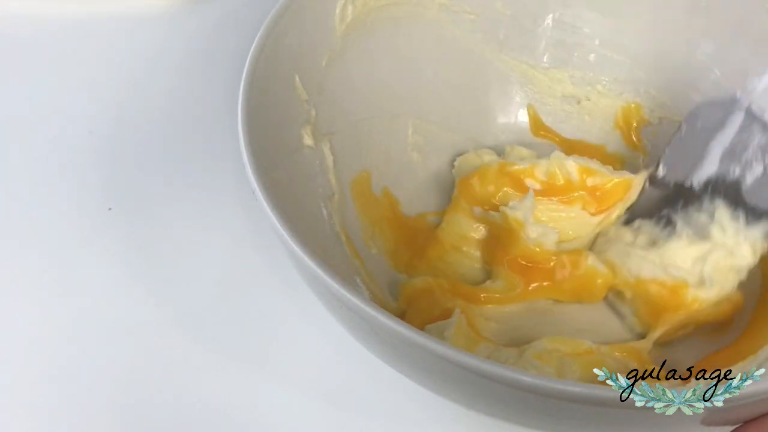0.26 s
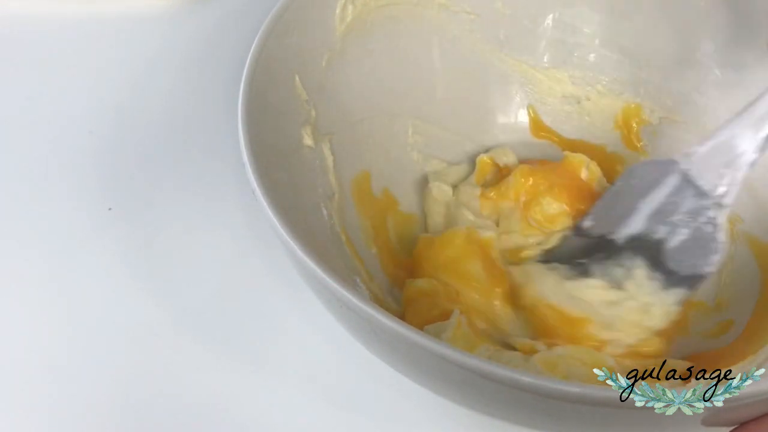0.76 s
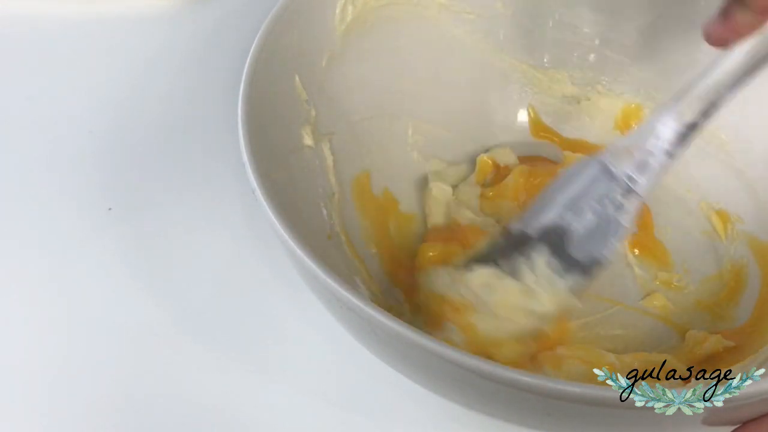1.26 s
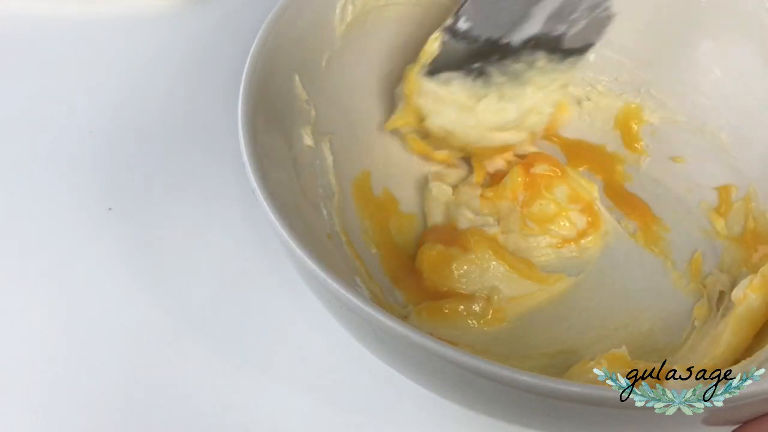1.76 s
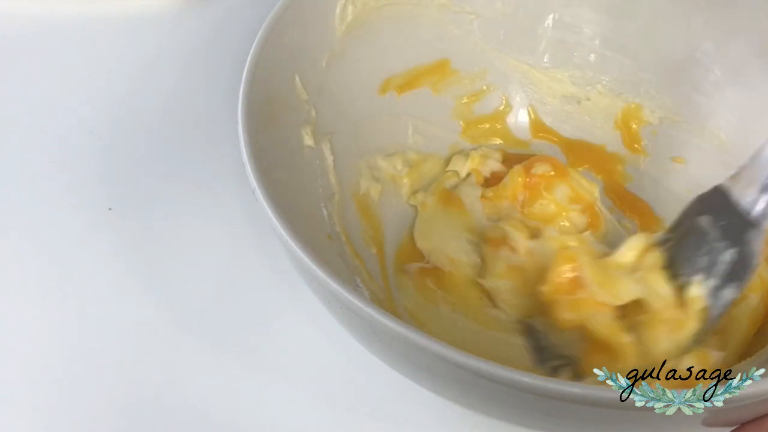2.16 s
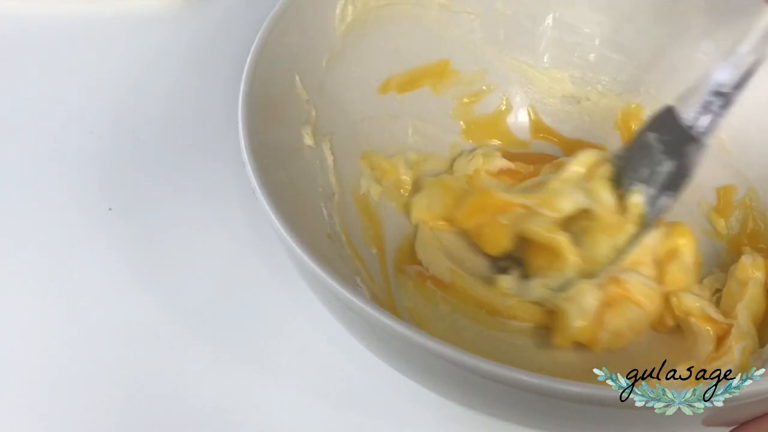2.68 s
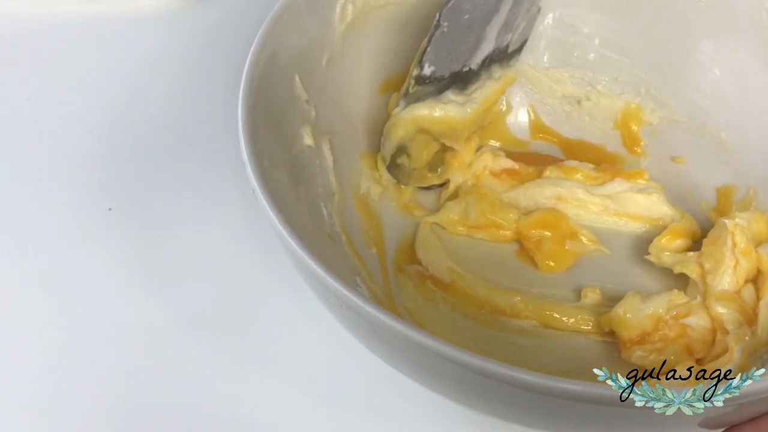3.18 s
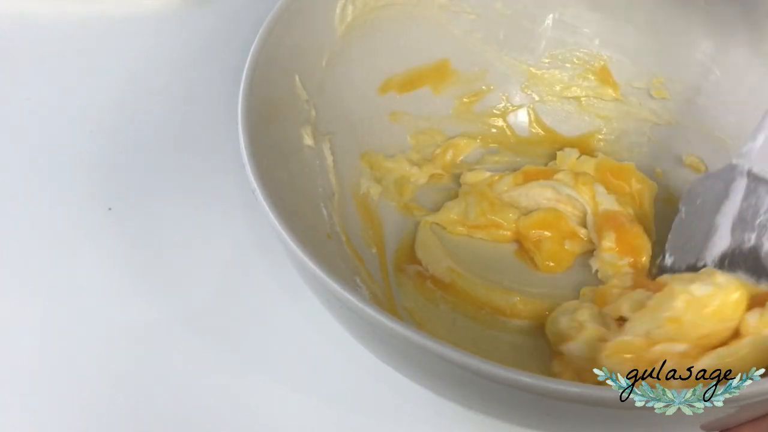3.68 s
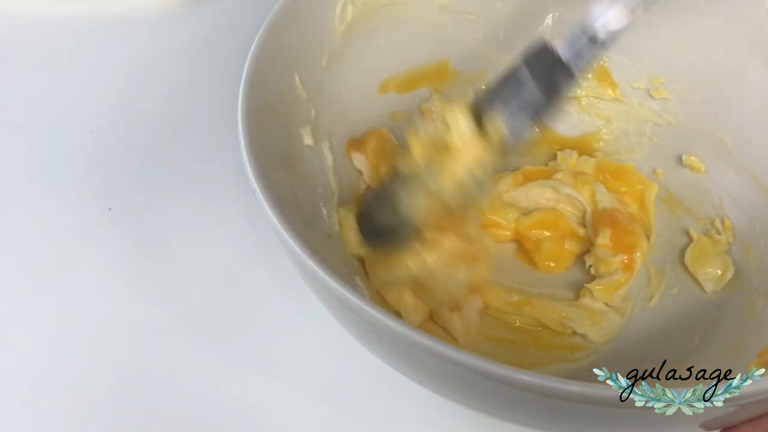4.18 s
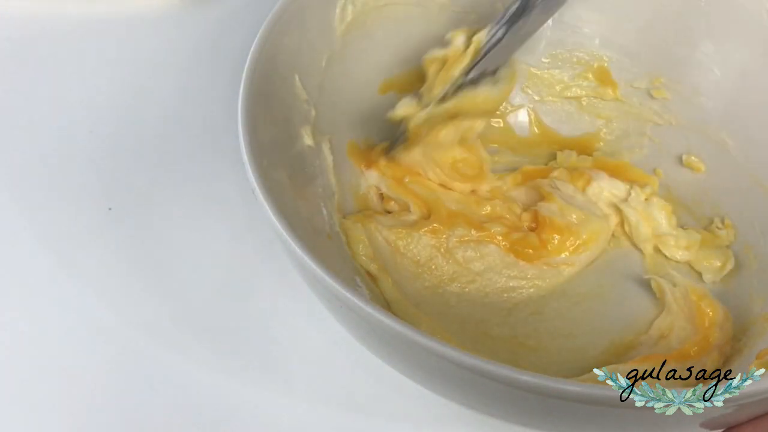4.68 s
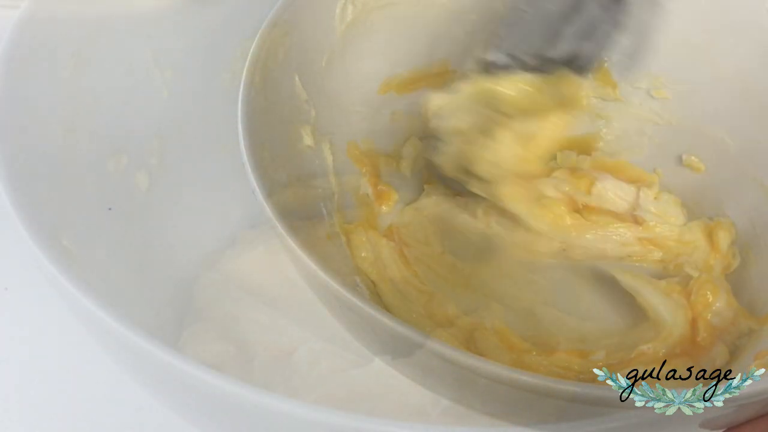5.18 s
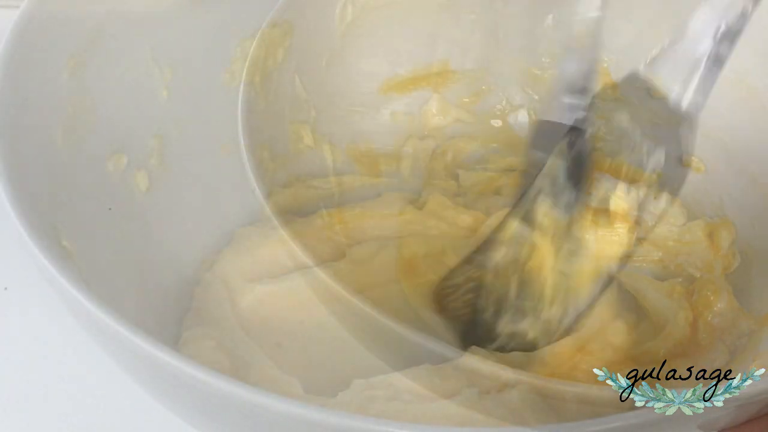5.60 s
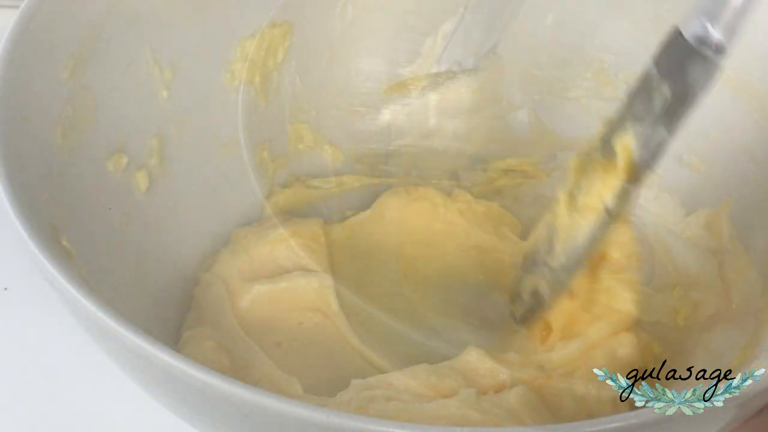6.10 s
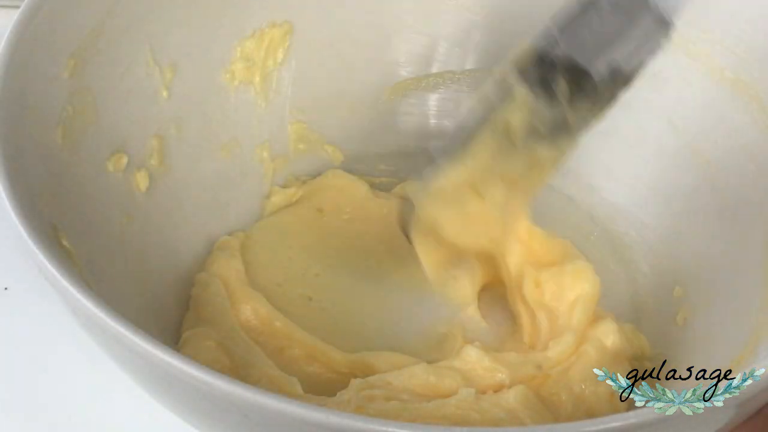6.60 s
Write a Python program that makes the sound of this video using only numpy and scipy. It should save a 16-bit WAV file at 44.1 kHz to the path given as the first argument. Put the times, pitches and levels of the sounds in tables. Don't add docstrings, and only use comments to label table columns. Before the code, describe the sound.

Thick buttery paste is folded close up: moist clicks and squishy strokes, hollow low thuds of the bowl, one longer scraping sweep midway.

```python
import sys
import numpy as np
from scipy import signal
from scipy.fft import rfft, irfft
from scipy.io import wavfile

SR = 44100
rng = np.random.default_rng(int(sys.argv[2]) if len(sys.argv) > 2 else 0)


def level_to_linear(level):
    exponent = np.asarray(level, float) / 20
    return 10 ** exponent


def to_wav(sig):
    pcm = np.clip(np.atleast_2d(sig), -1, 1) * 32767
    pcm = np.round(pcm).astype(np.int16)
    wavfile.write(sys.argv[1], SR, pcm.T)


N = 302082

# t/s, peak level/dB, boom near 110 Hz/dB, body near 290 Hz/dB, edge near 700 Hz/dB
KNOCKS = [(0.0, -46.5, -23, 1.5, -2), (0.299, -62, 2, -1, 0), (0.623, -35, -4, -4.5, 8.5),
          (1.362, -68, -7.5, 11, -10), (1.555, -59.5, -24, -19, 17.5), (1.922, -49, 0.5, -1, 2),
          (2.023, -44.5, -6, -2.5, -9), (2.618, -40, 11.5, 2.5, -29), (2.633, -30.5, -13, 1.5, 8.5),
          (3.254, -28, -2, -0.5, 7.5), (3.862, -75, -1, -17, -2), (3.93, -28.5, -7, -6, 6.5),
          (4.799, -29, -4.5, -5.5, 8), (4.904, -51.5, 7, -45, 21), (5.092, -79.5, -2, -32, 40),
          (5.654, -42, -7.5, -10, -37), (6.231, -55, 5, -1, 1), (6.436, -67.5, 14, -10, -25)]
# f/Hz, level/dB, t60/s
BOOM_MODES = [(53, -3, 0.77), (93.6, -0.5, 0.34), (133, -2.5, 0.8), (152, -6.5, 0.45), (188, 5, 0.36),
              (216, -6.5, 0.12), (270, -17, 0.23), (272, -3, 0.3), (307, 1, 0.35),
              (338, -12, 0.24), (421, -9, 0.12), (462, -12, 0.08), (490, -1, 0.13), (575, -14.5, 0.41),
              (641, -16, 0.33), (687, -3.5, 0.088), (759.7, -12, 0.24), (825, -8, 0.062), (858, -29, 0.11),
              (1000, -9, 0.034), (1127, -14.5, 0.14), (1368, -11.5, 0.062), (1800, -70, 0.033)]
MODES = BOOM_MODES
CONTROL_S = 0.004


def rms_one(x):
    return x / np.sqrt(np.mean(x ** 2) + 1e-20)


def in_time(rows):
    s, *columns = np.transpose(rows)
    return [np.interp(np.arange(N) / SR, s, c) for c in columns]


def at_hz(points, hz):
    point_hz, value = np.transpose(points)
    return np.interp(np.log(hz), np.log(point_hz), value)


def band(x, low_hz, high_hz):
    return signal.sosfilt(signal.butter(2, [low_hz, high_hz], "band", fs=SR, output="sos"), x)


def ring(x, hz, t60):
    r, w = level_to_linear(-60 / (t60 * SR)), 2 * np.pi * hz / SR
    return signal.lfilter([0, np.sin(w)], [1, -2 * r * np.cos(w), r * r], x + 1e-18)


def drift(rate_hz):
    r = np.exp(-80 * np.pi * rate_hz / SR)
    slow = signal.lfilter([1], [1, -2 * r, r * r], rng.standard_normal(N // 40 + 2002))[2000:]
    return np.interp(np.arange(N) / 40, np.arange(len(slow)), rms_one(slow))


def thuds(jolt_s, rise_cycles, wobble_db):
    t = np.arange(200) / SR
    jolt = np.exp(-t / jolt_s) * t
    s, db = np.transpose(KNOCKS)[:2]
    chance = rng.standard_normal((len(KNOCKS), len(MODES), 5))
    lag_s = np.cumsum(rng.uniform(.012, .045, (len(KNOCKS), 4)), axis=1)
    at = np.round((s[:, None] + np.c_[0 * s, lag_s]) * SR).astype(int)
    out = np.zeros(N)
    for m, (hz, mode_db, t60) in enumerate(MODES):
        tilt_db = [np.interp(np.log(hz), np.log([110, 190, 290, 700]), [boom, 0, body, edge])
                   for _, _, boom, body, edge in KNOCKS]
        wobble = level_to_linear(wobble_db - 60 * lag_s / t60) * chance[:, m, 1:]
        first = level_to_linear(1.5 * chance[:, m, 0])
        force = np.zeros(N)
        force[at] = level_to_linear(db + mode_db + tilt_db)[:, None] * np.c_[first, wobble]
        late = np.clip(np.log2(800 / hz), 0, 1)
        sign = -1 if hz < 230 and m % 2 else 1
        out += sign * ring(force, hz, t60)
        out -= sign * late * ring(force, hz, rise_cycles / hz)
    return signal.lfilter(jolt / jolt.sum(), [1], out)


def pops(swell_cycles, ring_cycles, snap_s):
    # t/s, peak level/dB, f/Hz, snap level/dB
    air_pockets = [(0.0466, -25, 2870, -0.5), (0.6805, -30.5, 5950, -23), (0.7627, -42.5, 1000, 18),
                   (0.763, -32, 3700, -5), (0.7963, -25, 3600, -8.5), (0.9878, -34.5, 2200, 10),
                   (1.0042, -32.5, 4070, -3), (1.39, -35, 3680, -5), (1.494, -39, 6500, 2),
                   (1.5474, -51, 2600, 2), (1.62, -48, 1730, 8), (1.636, -50, 1680, -9),
                   (1.8808, -54.5, 5850, 13), (2.0071, -55, 2100, 16.5), (2.0696, -39.5, 7200, 2),
                   (2.09, -35.5, 6650, -5), (2.3815, -38, 3370, 1.5), (2.6304, -46.5, 1800, 14.5),
                   (3.2316, -50.5, 6140, 7.5), (4.1791, -52, 2560, 7), (4.2945, -31, 4950, 4),
                   (4.4876, -51, 1700, 8.5), (4.5276, -46, 5900, -2), (4.629, -46.5, 1610, 9.5),
                   (4.8973, -37, 2050, 1), (5.036, -47.5, 3500, 3.5), (5.0983, -46, 2440, 4),
                   (5.354, -50.5, 1670, -17), (6.1946, -48, 3840, -3), (6.206, -45.5, 3900, -4),
                   (0.0552, -30, 7600, -1.5), (0.2204, -42, 11700, -11), (0.4342, -36.5, 12600, -3.5),
             (0.6805, -28, 11900, -19), (0.78, -43, 8900, 5.5), (0.8104, -46, 13700, -3),
             (1.361, -39, 14000, 1), (1.444, -42, 14100, -4), (1.496, -27.5, 8650, -28),
             (2.38, -27.5, 10100, -18), (2.4166, -51, 7060, 3), (2.7272, -38, 9300, -2.5),
             (2.9253, -48, 9150, -10), (3.01, -41.5, 11900, -14), (4.265, -38, 14800, -6),
             (4.326, -36, 7100, 5.5), (4.3725, -47, 13600, -6), (4.575, -27.5, 12000, -7.5),
             (4.59, -33, 14200, -4), (4.781, -48, 13000, 0), (4.7974, -46, 7290, -5),
             (4.8055, -31, 12500, -15), (4.886, -37.5, 13400, -8), (4.9424, -41, 6900, -8),
             (5.05, -33, 11100, -10), (5.1744, -44, 14500, -5), (5.613, -41, 9100, -11),
             (5.634, -41.5, 9000, -6), (6.4873, -48.5, 8800, -2),
                   (0.854, -51, 9080, -3), (1.5464, -40, 12800, -5), (1.6192, -46, 9500, 3),
            (1.636, -37.5, 13200, -2), (1.6776, -44, 15100, -9), (2.0489, -48, 7320, -9),
            (2.2722, -52, 10000, -2), (2.707, -44, 8500, -5.5), (3.3557, -38, 12200, -8),
            (3.9193, -45.5, 13700, -3), (3.9609, -43.5, 11100, -6), (4.143, -50, 12000, -3)]
    pockets = air_pockets
    out, t = np.zeros(N + 400), np.arange(400) / SR
    tear = rng.standard_normal((len(pockets), 400))
    for (s, db, hz, snap_db), noise in zip(pockets, tear):
        cycles = t * hz
        swell = np.sin(np.pi / 2 * np.minimum(cycles / swell_cycles, 1)) ** 2
        decay = level_to_linear(-60 * np.maximum(cycles - swell_cycles, 0) / ring_cycles)
        tone = np.sin(2 * np.pi * cycles) * swell * decay
        burst = noise * t / snap_s * np.exp(1 - t / snap_s)
        snap = band(burst, .45 * hz, min(2.2 * hz, 16000))
        out[round(s * SR):][:400] += level_to_linear(db) * (tone + level_to_linear(snap_db) * snap)
    return out[:N]


def blade():
    # start t/s, held t/s, level/dB, f/Hz
    strokes = [(0.05, 0.044, -56.5, 2600), (0.29, 0.043, -60, 2560), (0.62, 0.039, -60.5, 2000),
               (0.8, 0.14, -69.5, 2930), (0.96, 0.075, -62.5, 2200), (1.37, 0.022, -63, 2310),
               (1.54, 0.087, -60.5, 2190), (1.88, .04, -65, 2470), (2.0, 0.092, -67, 1880),
               (2.31, 0.031, -67.5, 2140), (2.63, 0.035, -56, 1440), (2.84, 0.055, -70, 2390),
               (4.54, 0.028, -64, 2350), (4.808, 0.016, -56.5, 3630), (4.9, 0.028, -66.5, 2300),
               (5.04, 0.067, -67, 2300), (5.41, 0.019, -63.5, 1800), (5.49, 0.14, -65.5, 1840),
               (5.62, 0.063, -63, 1480), (6.12, 0.032, -66.5, 1800), (6.23, 0.063, -64, 494)]
    # start t/s, held t/s, level/dB, f/Hz
    peels = [(0.05, 0.013, -57.5, 5200), (0.29, 0.055, -62.5, 4580), (0.62, 0.12, -67, 5500),
             (0.8, 0.09, -64, 3600), (0.985, 0.02, -56, 3950), (1.36, 0.044, -65, 4700),
             (1.5, 0.19, -63, 7400), (1.75, .1, -72, 8100), (1.88, 0.017, -58.5, 6240),
             (2.0, 0.037, -58.5, 5400), (2.31, 0.019, -64, 4600), (2.38, .05, -63.5, 8500),
             (2.63, 0.02, -62, 5230), (2.85, 0.042, -63, 4700), (4.17, 0.023, -67.5, 5050),
             (4.29, 0.07, -63, 7040), (4.54, 0.1, -65.5, 5260), (4.8, 0.038, -63.5, 6200),
             (5.05, 0.068, -65.5, 9200), (5.367, 0.049, -61, 6300), (5.5, .16, -67.5, 3300),
             (6.17, 0.066, -73, 4500)]
    # t/s, hollow level/dB, hollow f/Hz, ring level/dB, ring f/Hz
    sweep_rows = [
        (3.23, -67.5, 1910, -62, 5100),
        (3.35, -61, 2700, -67.5, 5430),
        (3.42, -57.5, 1410, -62.5, 5170),
        (3.5, -50.5, 1480, -55.5, 4900),
        (3.575, -45.5, 2170, -55, 5940),
        (3.65, -52, 1800, -57.5, 4080),
        (3.73, -63, 1930, -62.5, 5130),
        (3.88, -61, 1900, -67.5, 5600),
        (4.04, -76, 1600, -76, 5530),
    ]
    onset_db_per_s, fade_db_per_s, idle_db = 800, 141, -77
    t, sweep, columns = np.arange(0, N / SR, CONTROL_S), np.transpose(sweep_rows), []
    for rows, sweep_db, sweep_hz in [(strokes, *sweep[1:3]), (peels, *sweep[3:])]:
        s, held, db, hz = np.transpose(rows)[:, :, None]
        db = db - onset_db_per_s * np.maximum(s - t, 0) - fade_db_per_s * np.maximum(t - s - held, 0)
        db = np.vstack([db, np.interp(t, sweep[0], sweep_db, -200, -200)])
        hz = np.vstack([hz + 0 * t, np.interp(t, sweep[0], sweep_hz)])
        loudest = db.argmax(axis=0)
        columns += [np.maximum(db.max(axis=0), idle_db), hz[loudest, np.arange(len(t))]]
    return in_time(np.transpose([t, *columns]))


def smear(grain_db, grains_per_s):
    hollow_db, hollow_hz, bright_db, bright_hz = blade()
    sizes = level_to_linear(grain_db * np.minimum(rng.exponential(1, (2, N)), 3)) * rng.standard_normal((2, N))
    grains = sizes * (rng.random((2, N)) < grains_per_s / SR)
    width_oct = np.interp(hollow_db, [-62, -52], [.5, .22])
    out = 0
    for k, hz in enumerate(1000 * 2 ** np.arange(-1.5, 4, .25)):
        hollow = level_to_linear(hollow_db - 5.0) / (1 + (np.log2(hz / hollow_hz) / width_oct) ** 2)
        peak = np.exp(-.5 * (np.log2(hz / bright_hz) / 0.51) ** 2)
        air = np.interp(hz, [2400, 2600, 14000], [0, .55, .8])
        bright = level_to_linear(bright_db - 11.5) * (peak + air)
        patchy = level_to_linear(2.1 * drift(25.0))
        out = out + patchy * (hollow + bright) * rms_one(band(grains[k % 2], hz / 1.09, hz * 1.12))
    return out


def kitchen(x):
    # f/Hz, t60/s
    decay_times = [(600, .35), (2500, .35), (6000, .2), (14000, .15)]
    t = np.arange(SR // 2) / SR
    white = rng.standard_normal(len(t))
    tail = 0
    for low in 330 * 2. ** np.arange(6):
        decay = level_to_linear(-60 * t / at_hz(decay_times, 1.4 * low))
        tail = tail + band(white, low, min(2 * low, 17000)) * decay
    tail = tail * np.clip((t - .003) / 0.00067, 0, 1)
    return signal.fftconvolve(x, tail / np.sqrt(np.sum(tail ** 2)))[:N]


def rumble():
    # t/s, level/dB
    traffic = [(0.0, -42), (0.07, -47), (0.52, -56.5), (0.67, -49), (0.99, -58), (1.89, -52), (2.52, -65),
               (2.69, -40), (3.07, -62.5), (3.32, -51), (3.45, -56), (4.77, -59), (4.88, -54), (5.25, -60),
               (5.99, -54), (6.85, -56)]
    hum_db = -62.5
    rock_db, rock_s = -17.5, 0.07
    deep_db, = in_time(traffic)
    t, (s, knock_db) = np.arange(0, N / SR, CONTROL_S), np.transpose(KNOCKS)[:2]
    since = np.maximum(t - s[:, None], 0) / rock_s
    rocking, = in_time(np.c_[t, level_to_linear(knock_db + rock_db) @ (since * np.exp(1 - since))])
    noise = rng.standard_normal(N)
    deep = sum(level_to_linear(-.08 * hz) * ring(noise, hz, 0.17 * t60) for hz, db, t60 in MODES if hz < 110)
    upper = sum(level_to_linear(0.64 * db - .015 * hz) * ring(noise, hz, 0.15 * t60) for hz, db, t60 in MODES if hz > 110)
    return level_to_linear(deep_db) * rms_one(deep) + (level_to_linear(hum_db) + rocking) * rms_one(upper)


def hiss():
    # f/Hz, level per Hz/dB
    noise_spectrum = [(200, -40), (450, -18), (1000, -22), (2000, -25), (3500, -26), (4900, -30),
                      (6000, -29), (7600, -32), (9000, -31), (10500, -35), (12000, -32), (15750, -33.5),
                      (16000, -60)]
    # f/Hz, level/dB
    whine_spectrum = [(1000, -81), (4000, -81), (5000, -85), (6000, -83), (9000, -85), (10000, -88),
                      (15000, -90)]
    hiss_db, whine_hz = -66.5, 1001.6
    hz = np.fft.rfftfreq(N, 1 / SR) + 1
    noise = irfft(rfft(rng.standard_normal(N)) * level_to_linear(at_hz(noise_spectrum, hz)), N)
    turns = whine_hz * np.arange(N) / SR
    whine = 0
    for k in range(1, 16):
        level = level_to_linear(at_hz(whine_spectrum, k * whine_hz) + 2 + 2.5 * drift(45))
        whine = whine + level * np.sin(2 * np.pi * (k * turns + rng.random()))
    return level_to_linear(hiss_db) * rms_one(noise) + whine


def scene():
    knocks = level_to_linear(-2.5) * thuds(jolt_s=0.00022, rise_cycles=5.0, wobble_db=-9.5)
    bursts = pops(swell_cycles=2.2, ring_cycles=12.0, snap_s=.00035)
    wet = kitchen(level_to_linear(-6.5) * knocks + level_to_linear(-10.5) * bursts)
    smears = smear(grain_db=4.0, grains_per_s=6000.)
    return (knocks + bursts + wet + smears + rumble() + hiss())[None]


def roll_off(x):
    return signal.sosfilt(signal.butter(12, 16660, fs=SR, output="sos"), x)


def record(dry):
    cut = signal.sosfilt(signal.butter(6, 45, "high", fs=SR, output="sos"), dry)
    cut = signal.sosfilt(signal.cheby2(12, 60, 16900, fs=SR, output="sos"), cut)
    return roll_off(cut)


dry = scene()
out = record(dry)
to_wav(out)
```